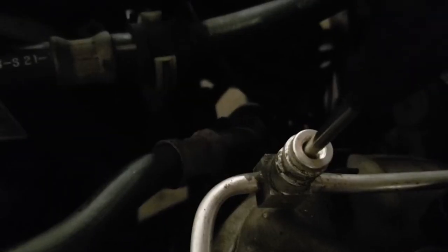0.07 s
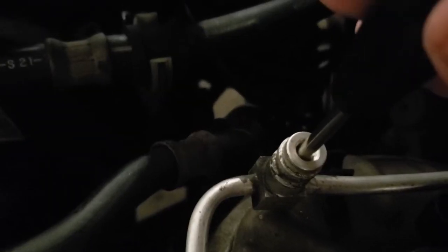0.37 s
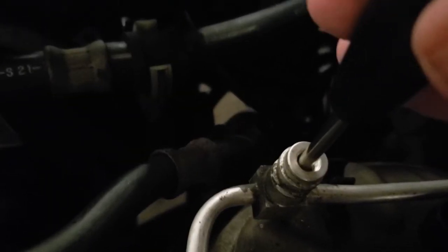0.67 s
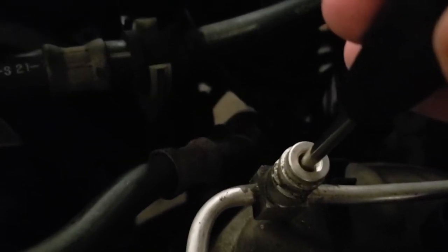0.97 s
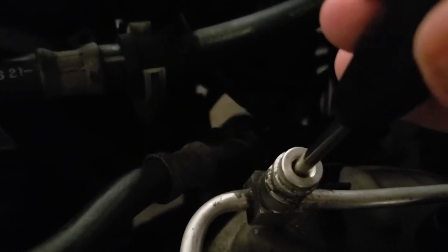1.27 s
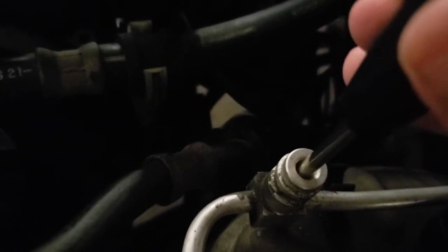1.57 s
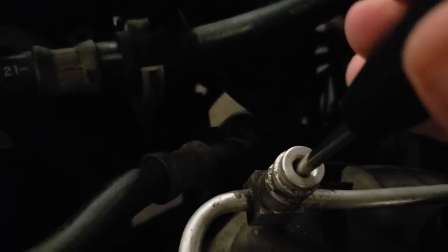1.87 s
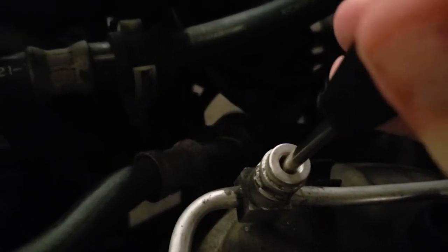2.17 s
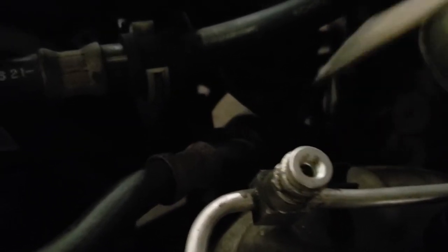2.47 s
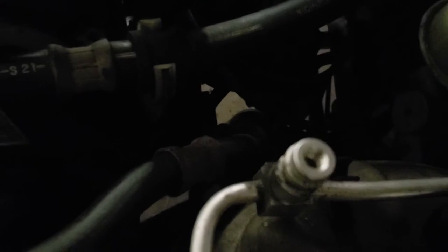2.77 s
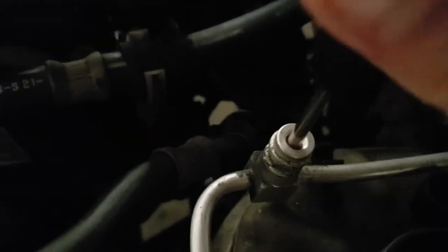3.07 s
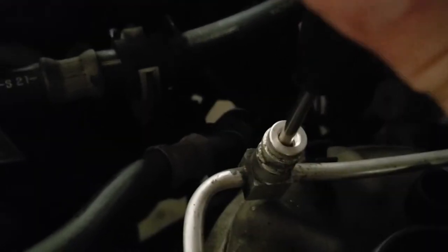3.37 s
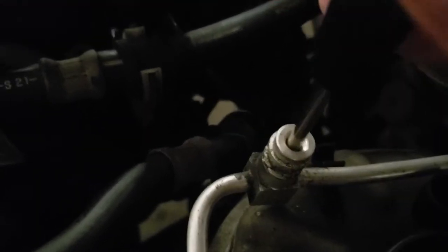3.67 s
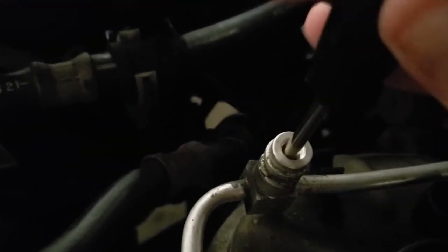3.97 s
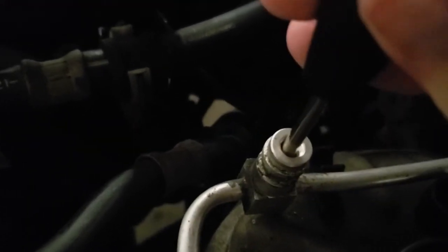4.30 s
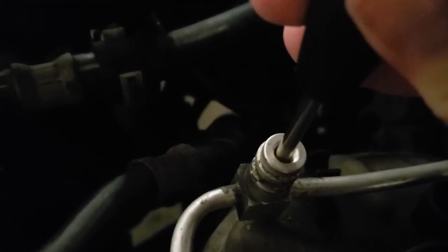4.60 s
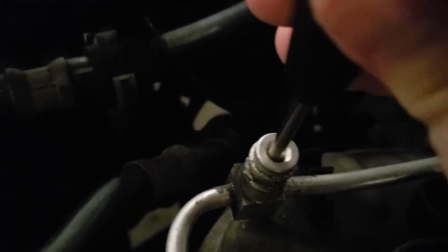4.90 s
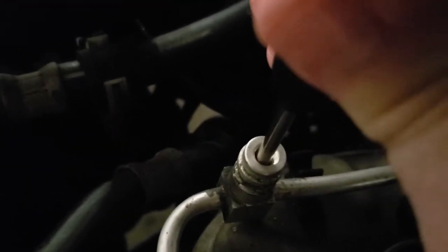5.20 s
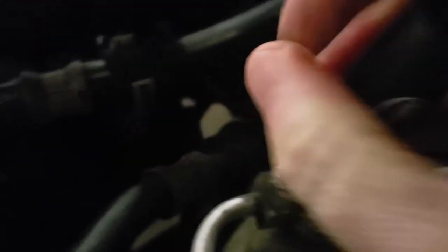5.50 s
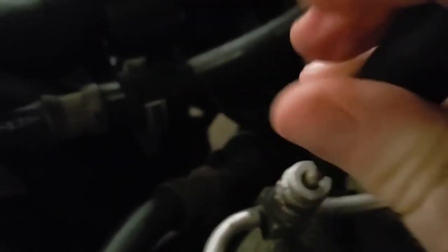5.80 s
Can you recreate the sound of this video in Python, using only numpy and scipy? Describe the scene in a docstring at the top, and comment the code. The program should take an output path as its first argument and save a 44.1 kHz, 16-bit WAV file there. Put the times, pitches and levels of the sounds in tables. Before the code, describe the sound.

Pressurized gas hisses from a valve in a car's engine bay as a small screwdriver presses the pin. It comes in two long spurts with a faint seep between them. Each slip of the tip clicks and changes the hiss, sometimes with a brief steel ring. Then the gas stops and the tool comes off with quick, sharp clicks. The microphone is close, in a garage with a low hum and slight echo.

```python
"""Gas hisses from a valve in a car's engine bay as a small screwdriver presses its pin, close to a phone.
The gas comes in two long spurts and seeps between them. Each slip of the tip clicks, thuds through
the pipes, changes the hiss and may ring the steel. Then the tool comes off with quick sharp clicks.
A low hum fills the garage, which echoes faintly."""
import sys
import numpy as np
from scipy import signal
from scipy.fft import rfft, irfft
from scipy.io import wavfile

SR = 44100
rng = np.random.default_rng(int(sys.argv[2]) if len(sys.argv) > 2 else 0)


def store_wav(level_fs):
    """Save 16-bit WAV to argv[1]."""
    pcm = np.round(np.clip(np.atleast_2d(level_fs), -1, 1) * 32767)
    wavfile.write(sys.argv[1], SR, pcm.T.astype(np.int16))


N = 266760
T = np.arange(N) / SR
FREQS = np.maximum(np.arange(N // 2 + 1) * SR / N, 1)

# Levels are set before the final mix. A fade time is how long a sound takes to drop by 60 dB.
# tone of the jet for each position of the tip (frequency [Hz], level [dB])
PRESSED = [(410, -67.5), (700, -40), (3520, -24.5), (4320, -22.5), (4670, -25.5), (5590, -15), (6770, -21),
           (11300, -6), (13000, -11), (15000, -15)]
SHIFTED = [(410, -28), (700, -26), (4000, -7), (5520, -6.5), (6770, -9), (8000, -5), (9700, -5), (11600, 1),
           (13000, -4.5), (15000, -3)]
SEEPING = [(410, -32), (700, -35), (928, -38), (1210, -33), (1330, -35.5), (1720, -30.5), (2080, -28),
           (3100, -39.5), (5880, -19.5), (8640, -14.5), (10100, -12), (15000, 7.5)]
REOPENED = [(410, -22.5), (700, -28.5), (1780, -22.5), (2190, -17), (3390, -20.5), (5240, -11.5),
            (5810, -7.5), (7900, -1), (9330, -1.5), (11000, 4.5), (15000, -6)]
EASED = [(410, -43), (700, -37), (2190, -26), (4000, -23.5), (4380, -25), (4790, -24.5), (7320, 3),
         (9210, -2.5), (12400, 9), (15000, 8)]
# each jet holds until the next takes over (time [s], changeover [s], hiss level [dB],
# low rush over hiss [dB], high sizzle over hiss [dB], sizzle drift [dB/s], tone [table])
JETS = [(-0.05, 0.008, -50.5, -15, 5, 0, SEEPING), (0.082, 0.038, -31.5, -19, 5, -4.5, PRESSED),
        (0.85, 0.038, -37, -17.5, -0.5, 3, PRESSED), (1.403, 0.0049, -33.7, -12, 3.5, -11, SHIFTED),
        (1.95, .15, -32, -12.5, 2, -6, SHIFTED), (2.41, .012, -38, -13, 1, 0, SHIFTED),
        (2.455, 0.0062, -62.5, -14.5, 4, -2, SEEPING), (3.083, 0.0027, -52.5, -12.5, 4, 5, SEEPING),
        (3.71, .002, -29.5, -12, 2, 1, REOPENED), (4.15, 0.14, -28, -6.5, -3, -5.5, EASED),
        (4.977, .006, -34.5, -8.5, -0.5, -11, EASED), (5.369, 0.062, -50, -5, -0.5, 2.5, SEEPING)]
# peaks and dips that the valve's mouth puts on the jet (frequency [Hz], width [Hz], level [dB])
MOUTH = [(2095, 510, 2), (3445, 86, -10), (4410, 190, 3), (5950, 150, -3.5), (7040, 390, -2),
         (7190, 820, 4.5), (8090, 1000, 8), (8900, 230, 8.5), (9780, 220, 5), (10600, 470, 3.5),
         (11360, 300, 5), (13120, 300, 3.5), (13000, 500, 1), (14200, 350, 4), (15050, 700, 4.5)]
# puffs of gas as the tip slips (time [s], level [dB])
SPITS = [(1.411, -18), (4.987, -21.5), (5.352, -22)]
# contacts of the tool (time [s], level [dB], pitch [Hz], spread [octaves], rattle fade time [s],
# thud level offset [dB], thud pitch [Hz])
CLICKS = [(0.181, -38, 2920, 1, 0.1, -12, 400), (1.4035, -14.5, 2420, .9, 0.021, -17.5, 260),
          (1.903, -36, 1800, 0.41, 0.011, -28, 600), (2.4396, -26.5, 2960, 0.47, 0.0054, -8.5, 600),
          (2.453, -25.5, 3030, 1.34, 0.04, -3.5, 650), (2.4644, -20, 2920, 0.88, 0.016, -18, 670),
          (3.708, -11.5, 3280, 1.34, 0.032, -13, 530), (3.9309, -14, 2400, 1.23, 0.04, -14.5, 860),
          (4.889, -36.5, 1000, 0.71, 0.0073, -16, 890), (4.984, -18, 3900, 1.5, .012, -18, 730),
          (5.349, -13, 6000, 2.5, 0.028, -16, 1300), (5.368, -13.5, 2870, 1.2, .018, -9.5, 604),
          (5.3888, -11, 2350, 0.93, 0.0043, -21.5, 450), (5.4867, -19, 6700, 1.5, .036, -27, 910),
          (5.6224, -13.5, 6060, 1.9, 0.042, -13, 924), (5.626, -7, 5850, 1.28, 0.014, -22.5, 460),
          (5.7234, -18.5, 3280, 1.3, 0.048, -15.5, 960), (5.7834, -34, 3240, 0.69, 0.034, -18, 1000),
          (5.799, -31, 12700, 0.26, .006, -19, 900), (5.982, -44, 3940, 1.5, 0.044, -10, 504),
          (5.999, -41, 5030, 1.7, 0.014, -20, 900), (6.012, -19, 9700, 1, 0.012, -38, 910),
          (6.013, -27.5, 2100, 0.64, .045, -27, 1500), (6.041, -40, 4970, 1, 0.022, -30, 900)]
# where the screwdriver's shaft rings (frequency [Hz], width [Hz], level [dB])
SHAFT = [(2184, 110, -4), (2520, 180, -6), (3617, 110, -10.5), (7400, 350, -6)]
# where the pipes and their mounts ring (frequency [Hz], width [Hz], level [dB])
PIPES = [(169, 80, 2.5), (283, 110, -3.5), (405, 20, -5), (565, 18, -8), (754, 60, -2.5), (915, 37, -8),
         (1238, 190, -1.5), (1640, 130, -4.5)]
# skids of the tip (time [s], level [dB], swell [s], ring length [factor], pitch [Hz], spread [octaves])
SKIDS = [(1.405, -19, .007, .6, 2600, 2.0), (1.409, -24.5, .01, 1.2, 6200, .4),
         (4.988, -19.5, .007, .7, 2500, 1.8), (5.015, -24.5, .006, 1.1, 4411, .1)]
# ringing notes of the steel tip and valve (frequency [Hz], level [dB], fade time [s])
STEEL_NOTES = [(1562, 3, .12), (1790, -3, .07), (3074, -2, .11), (4411, -4, .18), (5284, -8, .16),
               (5529, -3, .33), (6229, -6, .42), (6279, -6, .44), (7150, -8, .16), (7758, -3, .2),
               (8787, -12, .28)]
# dull bumps of the hand (time [s], level [dB], pitch [Hz], length [s])
BUMPS = [(1.42, -50, 55, .02), (1.69, -44.5, 125, .05), (3.745, -40, 125, .03), (5.372, -42, 58, .02),
         (5.415, -49, 280, .028), (5.63, -50, 80, .01)]
# how the hum and rumble rise and fall (time [s], level [dB])
HUM_LEVEL = [(0, -3), (1.38, -7), (2.4, -12), (3.07, -12), (3.1, -2), (3.7, -2.5), (4.0, -6.5),
             (4.95, -8.5), (5.25, -16.5), (5.5, -9), (5.7, -28), (6.05, -15.5)]
# notes of the hum, tone of the rumble and tone of the faint air (frequency [Hz], level [dB])
HUM_NOTES = [(120.6, -56), (215.3, -54), (264, -68), (297.5, -64)]
RUMBLE = [(15, -72), (25, -37), (54, -1.5), (85, -14), (114, -2), (151, -6), (213, -1), (244, -8),
          (301, -15), (340, -15), (389, -16), (557, -27), (900, -35.5), (1170, -60), (1980, -120)]
AIR = [(290, -75), (500, -52.5), (896, -29), (1450, 2.5), (2840, -0.5), (4110, -31.5), (4940, 9.5),
       (15000, 16.5)]
# what reaches the right microphone, which faces away (frequency [Hz], level [dB])
SHADE = [(300, -7.5), (1000, -19), (2200, -19), (5000, -8.5), (9000, -10), (15000, -9)]
# how much garage echo the clicks get: least around the loud snap, most for the last clicks
# (time [s], level [dB])
TOOL_ECHO = [(5.2, -1), (5.35, -4), (5.45, -11), (5.6, 1)]

SHUT_S, SHUT_GLIDE_S = 5.568, 0.012  # the pin closes
QUIET_S = (2.445, 3.086)  # the hiss drops to a faint seep with a thin whistle (start [s], end [s])
MOUTH_FULL_DB, MOUTH_FADE_DB = -31, 28.5  # a jet this loud gets MOUTH as listed; this much weaker, none
RATTLE_DB, RATTLE_REF_S = 10.5, 0.044  # a rattle's energy over its first pulse, at this fade time


def gas_jet(hiss_flutter_db=0.5, rush_flutter_db=1.23, scatter_db=1):
    """Swirling gas rushes, hisses and sizzles. Gives the jet and a copy scattered by the engine bay."""
    mouth = undb(sum(db * np.exp(-(2 * (FREQS - hz) / width) ** 2) for hz, width, db in MOUTH))
    low = 1 / (1 + (FREQS / 5200) ** 12)
    high = 1 / (1 + (13000 / FREQS) ** 30)
    middle = (1 - low) * (1 - high)
    hiss_flutter, rush_flutter = hiss_flutter_db * walk(45), rush_flutter_db * walk(17)
    out = np.zeros((2, N))
    ends = [row[:2] for row in JETS[1:]] + [(SHUT_S, SHUT_GLIDE_S)]
    for (start, glide, hiss_db, rush_db, sizzle_db, drift, points), (end, release) in zip(JETS, ends):
        share = changeover(start, glide) * (1 - changeover(end, release))
        on = share > 1e-6
        held_s = np.clip(T[on] - start, 0, end - start)
        mouth_strength = np.clip(1 + (hiss_db - MOUTH_FULL_DB) / MOUTH_FADE_DB, 0, 2)
        tone = tone_curve(points) * mouth ** mouth_strength
        # the fine detail of the tone changes as the tool creeps from its first position to its last
        first, last = tone * ripple(), tone * ripple()
        creep = held_s / (end - start)
        bands = ((low, rush_db + rush_flutter[on]),
                 (middle, hiss_flutter[on]),
                 (high, sizzle_db + drift * held_s + hiss_flutter[on]))
        for band, db in bands:
            swirl = np.sqrt(1 - creep) * noise(first * np.sqrt(band))[on]
            swirl += np.sqrt(creep) * noise(last * np.sqrt(band))[on]
            scattered = undb(scatter_db) * swirl[::-1]  # backwards: same tone, different wave
            out[:, on] += np.sqrt(share[on]) * undb(hiss_db + db) * np.array([swirl, scattered])
    return out


def changeover(s, glide):
    """Share of the flow that has switched, rising from 0 to 1 around time s."""
    return .5 + .5 * np.tanh(2 * (T - s) / glide)


def ripple(depth_db=2.6, spacing_hz=110):
    """Reflections around the tool put small, uneven peaks and dips in the tone."""
    knots = np.arange(0, SR / 2, spacing_hz)
    return undb(depth_db * np.interp(FREQS, knots, rng.standard_normal(1024)[:len(knots)]))


def spits(hz=14900, octaves=0.27, length_s=0.005):
    """Gas spits past the slipping tip in very short, very high puffs."""
    puffs = sum(undb(db) * np.exp(-((T - s) / length_s) ** 2) for s, db in SPITS)
    return puffs * noise(1 / (1 + (np.log2(FREQS / hz) / octaves) ** 4))


def whistle(hz=5500, width_hz=650, db=-70):
    """The seeping gas gives a thin, faint whistle in the quiet stretch."""
    start, end = QUIET_S
    return undb(db) * ((T > start) & (T < end)) * noise(peak(hz, width_hz))


def clicks(boost_db=16):
    """Each contact is a sharp pulse and a rattle of small parts, ringing in the screwdriver's shaft."""
    out, t = np.zeros(N), T[:SR // 3]
    for s, db, hz, octaves, fade_s, *_ in CLICKS:
        rattle = rng.standard_normal(len(t)) * fade(t, fade_s)
        force = undb(RATTLE_DB) * np.sqrt(fade_s / RATTLE_REF_S) * unit_energy(rattle)
        force[0] += 1  # the first pulse
        click = signal.fftconvolve(unit_energy(force), contact(hz, octaves))[:len(t)]
        add(out, s, undb(db + boost_db) * click)
    ring = sum(undb(db) * signal.lfilter(*signal.iirpeak(hz, hz / width, fs=SR), out)
               for hz, width, db in SHAFT)
    return out + ring


def contact(hz, octaves, size=512):
    """The pulse of one hard tap: a broad hump of frequencies, all starting at once."""
    freqs = np.maximum(np.arange(size // 2 + 1) * SR / size, 30)
    log_hump = -2 * np.log1p((np.log2(freqs / hz) / octaves) ** 2 / 2)
    # folding the cepstrum (the log spectrum turned into time) packs the energy at the start
    cepstrum = irfft(log_hump)
    folded = np.r_[cepstrum[0], 2 * cepstrum[1:size // 2]]
    return unit_energy(irfft(np.exp(rfft(folded, size))))


def thuds(trim_db=-3, fade_s=0.19, right_db=-3, octaves=0.98, shared=0.17):
    """Each contact also shakes the pipes, which gives a rough thud from all round the bay."""
    out, t = np.zeros((2, N)), T[:SR // 3]
    pipe_tone = sum(undb(db) * peak(hz, width) for hz, width, db in PIPES)
    shape = fade(t, fade_s) * (1 - np.exp(-t / 0.0028))
    left = noise(pipe_tone)
    right = noise(pipe_tone) + shared * left
    for track, pipes, side_db in ((out[0], left, 0), (out[1], right, right_db)):
        for s, db, *_, thud_db, hz in CLICKS:
            shaking = np.roll(pipes, int(s * SR))[:len(t)]
            ring = unit_level(signal.fftconvolve(shaking, contact(hz, octaves))[:len(t)])
            add(track, s, undb(db + trim_db + thud_db + side_db) * ring * shape)
    return out


def skids(chatter_db=-6):
    """The tip chatters over the valve's rim; steel notes near that pitch swell and die away."""
    out, t = np.zeros(N), T[:SR // 2]
    for s, db, swell_s, stretch, pitch_hz, octaves in SKIDS:
        drive = 1 / (1 + (np.log2(FREQS / pitch_hz) / octaves) ** 2)
        chatter = noise(drive / (1 + (FREQS / 7000) ** 2))[:len(t)] * fade(t, 0.11)
        ring = np.zeros(len(t))
        for hz, note_db, fade_s in STEEL_NOTES:
            strength = np.interp(hz, FREQS, drive) * undb(note_db)
            ring += strength * fade(t, fade_s * stretch) * np.sin(2 * np.pi * (hz * t + rng.random()))
        swell = 1 - np.exp(-(t / swell_s) ** 2)
        add(out, s, undb(db) * swell * (ring + undb(chatter_db) * chatter))
    return out


def bumps():
    """The hand leans on the pipe and makes soft, low swells."""
    out = np.zeros(N)
    for s, db, hz, length_s in BUMPS:
        swell = np.exp(-((T - s) / length_s) ** 2)
        out += undb(db) * swell * noise(1 / (1 + (3 * np.log(FREQS / hz)) ** 4))
    return out


def garage_hum(rumble_db=-52, side_db=-8, deep_hz=110, waver=0.15, air_db=-65.5):
    """Low notes waver over a rumble and a faint, steady hiss of air."""
    notes = np.zeros(N)
    for hz, db in HUM_NOTES:
        wave = np.sqrt(2) * np.sin(2 * np.pi * hz * T + 0.25 * walk(7.2))
        notes += undb(db) * wave * (1 + waver * walk(6.8))
    middle = noise(tone_curve(RUMBLE))
    deep_lift = 1 + 2 / (1 + (FREQS / deep_hz) ** 6)  # left and right are least alike in the deep bass
    side = undb(side_db) * noise(tone_curve(RUMBLE) * deep_lift)
    rumble = undb(rumble_db) * np.array([middle + side, middle - side])
    air = undb(air_db) * np.array([noise(tone_curve(AIR)), noise(tone_curve(AIR))])
    return level_curve(HUM_LEVEL) * (notes + rumble) + air


def echo(sound, fade_s, low_hz, high_hz):
    """Many reflections in a space blur into one fading tail."""
    t = T[:SR]
    band = 1 / np.sqrt((1 + (low_hz / FREQS) ** 4) * (1 + (FREQS / high_hz) ** 2))
    tail = noise(band)[:SR] * fade(t, fade_s) * (1 - np.exp(-t / 0.002))
    return signal.fftconvolve(sound, unit_energy(tail))[:N]


def undb(db):
    """Turn decibels into a gain to multiply by."""
    return 10 ** (np.asarray(db) / 20)


def unit_level(x):
    """Scale so the squared samples average 1."""
    return x / np.sqrt(np.mean(x ** 2))


def unit_energy(x):
    """Scale so the squared samples add up to 1."""
    return x / np.linalg.norm(x)


def level_curve(points):
    """Gain at every moment from (time [s], level [dB]) points."""
    return undb(np.interp(T, *np.transpose(points)))


def tone_curve(points):
    """Gain at every frequency from (frequency [Hz], level [dB]) points."""
    hz, db = np.transpose(points)
    return undb(np.interp(np.log(FREQS), np.log(hz), db))


def peak(hz, width_hz):
    """Gain that favours the frequencies near hz."""
    return 1 / (1 + (2 * (FREQS - hz) / width_hz) ** 2)


def noise(gain):
    """Noise of level 1, shaped by a gain for each frequency."""
    return unit_level(irfft(rng.standard_normal(2 * len(FREQS)).view(complex) * gain, N))


def walk(rate_hz):
    """A smooth random wander, about 1 in size."""
    return noise(1 / (1 + (FREQS / rate_hz) ** 4))


def fade(t, fade_s):
    """Die away, 60 dB down after fade_s."""
    return np.exp(-np.log(1000) * t / fade_s)


def add(track, s, sound):
    """Mix a sound in at time s."""
    start = max(int(s * SR), 0)
    track[start:start + len(sound)] += sound[:max(N - start, 0)]


def scene(near_db=4.5, bay_left_db=-8, bay_right_db=-10, garage_db=-16, jet_echo_db=-4):
    """The valve faces the left microphone; the right one is shaded, so echoes stand out more there."""
    jet, scattered = gas_jet()
    tool, pipes = clicks() + skids(), thuds()
    valve = jet + spits() + whistle() + tool
    to_garage = undb(jet_echo_db) * jet + level_curve(TOOL_ECHO) * (tool + pipes[1])
    left = undb(near_db) * valve
    delayed = np.r_[np.zeros(8), valve][:N]  # sound reaches the right side 8 samples later
    right = irfft(rfft(delayed + scattered) * tone_curve(SHADE), N)
    sides = []
    for direct, bay_db in ((left, bay_left_db), (right, bay_right_db)):
        bay = undb(bay_db) * echo(tool, fade_s=0.046, low_hz=297, high_hz=11300)
        garage = undb(garage_db) * echo(to_garage, fade_s=0.46, low_hz=648, high_hz=5850)
        sides.append(direct + bay + garage)
    return np.array(sides) + pipes + garage_hum() + bumps()


def record(dry):
    """The phone clips at full scale and cuts the treble above 15740 Hz."""
    treble_cut = signal.ellip(10, .2, 70, 15740, fs=SR, output="sos")
    return signal.sosfilt(treble_cut, np.clip(dry, -1, 1))


dry = scene()
out = record(dry)
store_wav(out)
```